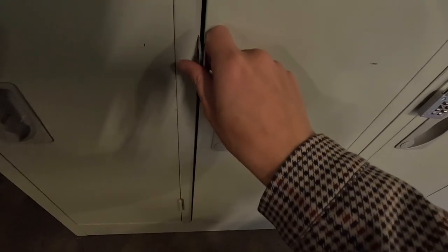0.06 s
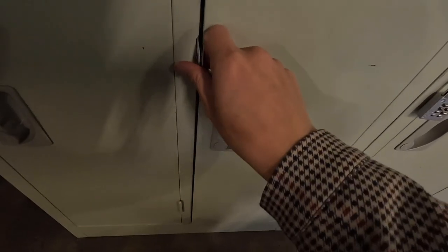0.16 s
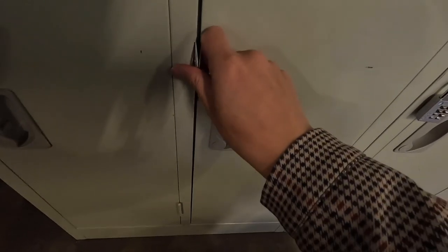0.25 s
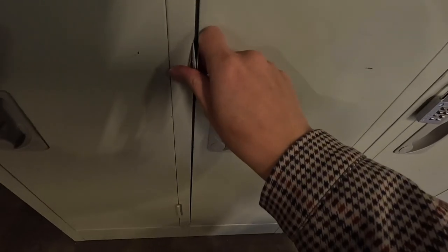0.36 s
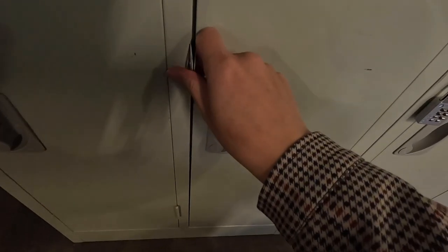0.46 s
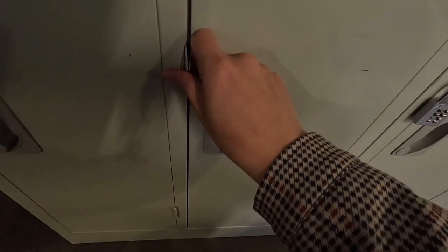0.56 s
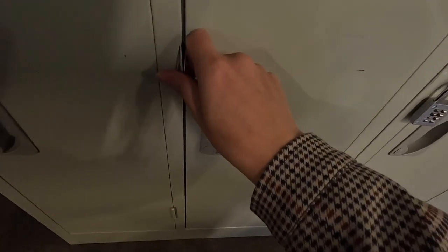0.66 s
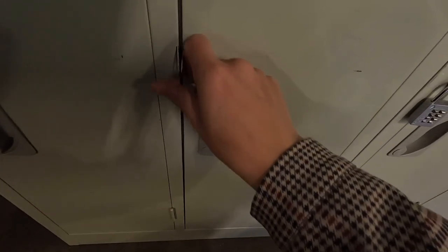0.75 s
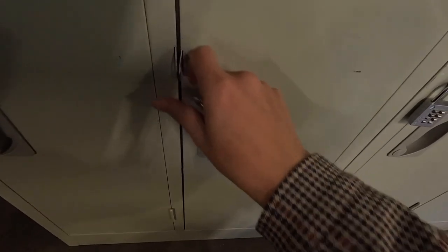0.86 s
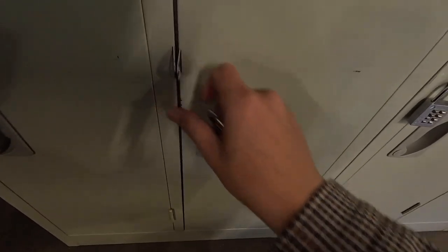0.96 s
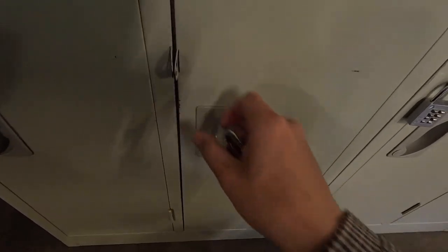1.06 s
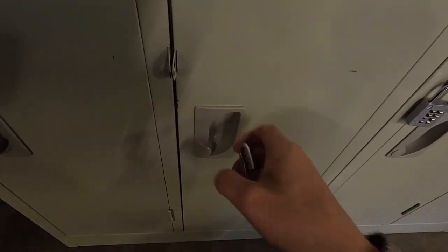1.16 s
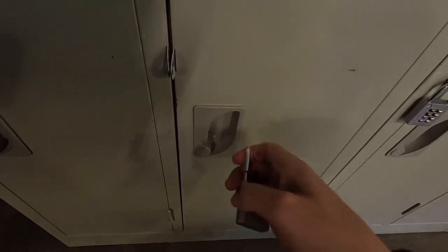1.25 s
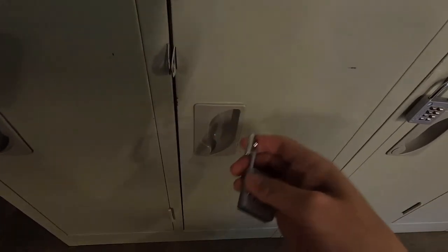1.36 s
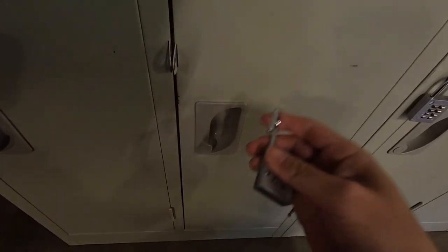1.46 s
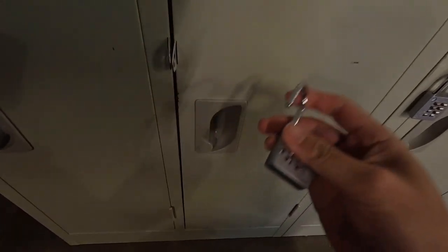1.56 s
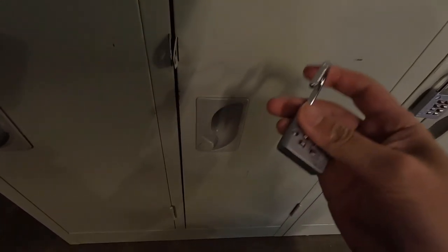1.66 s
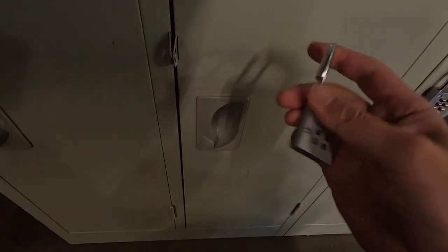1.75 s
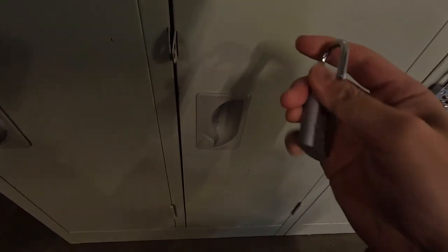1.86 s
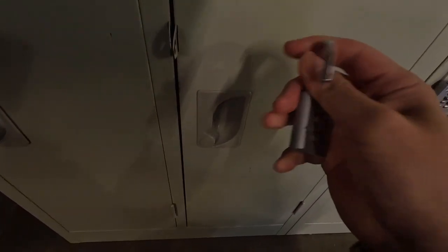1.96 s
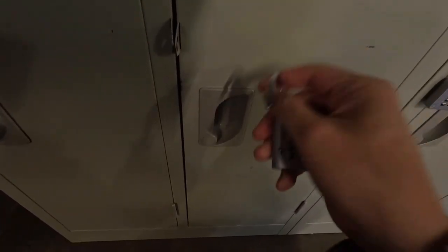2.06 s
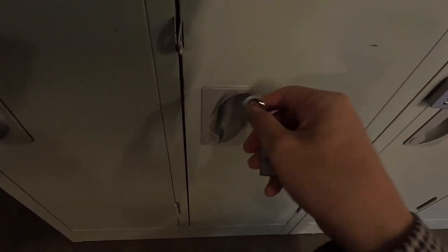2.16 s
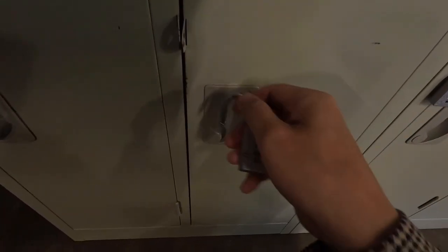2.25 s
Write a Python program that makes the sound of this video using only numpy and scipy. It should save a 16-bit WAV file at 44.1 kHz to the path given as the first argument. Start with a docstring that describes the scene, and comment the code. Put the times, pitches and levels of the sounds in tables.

```python
"""A sheet-metal locker door drags and slams in a burst of quick knocks, then rings down as decaying modes
and a dense wash, with bright filtered-noise latch ticks; lighter knocks follow.
Then a padlock clicks in the hand close to a phone: random contact trains ring damped modes in a small room.
Shaped noise gives ventilation and street rumble; the phone's gain control ducks on loud sound."""
import sys
import numpy as np
from scipy import signal
from scipy.fft import rfft, irfft
from scipy.io import wavfile
from scipy.ndimage import uniform_filter1d

SR = 44100
rng = np.random.default_rng(int(sys.argv[2]) if len(sys.argv) > 2 else 0)


def volts_from_decibels(level):
    """Turn decibel levels (scalar or array-like) into linear amplitude factors."""
    exponent = np.asarray(level, float) / 20
    return 10 ** exponent


def store_pcm(level_fs):
    """Save levels as 16-bit WAV."""
    pcm = np.round(np.clip(level_fs, -1, 1) * 32767).astype(np.int16)
    wavfile.write(sys.argv[1], SR, np.atleast_2d(pcm).T)


N = 101430
DOOR_NARROW_DB = -5  # extra side gain for the door's noise


def on_log(table, hz):
    """Log-frequency interpolation of a (f/Hz, value) table."""
    a = np.array(table, float)
    return np.interp(np.log(np.maximum(hz, 1)), np.log(a[:, 0]), a[:, 1])


def colour(x, table):
    """Linear filtering: multiply the spectrum by a (f/Hz, level/dB) table."""
    n = x.shape[-1]
    gain = volts_from_decibels(on_log(table, np.fft.rfftfreq(n, 1 / SR)))
    return irfft(rfft(x) * gain, n)


def unit(x):
    """Normalisation to rms 1."""
    return x / np.sqrt(np.mean(x ** 2))


# side relative to mid in diffuse sound: f/Hz, level/dB
STEREO_SPREAD = [(30, -20), (250, -16), (1000, -5), (4000, -2), (12000, -37.5)]


def wide(n, narrow_db=0):
    """Interchannel coherence: mid and side noise whose balance varies with frequency."""
    mid, side = rng.standard_normal((2, n))
    side = volts_from_decibels(narrow_db) * colour(side, STEREO_SPREAD)
    return mid + side * np.array([[1], [-1]])


def fade(t, t60):
    """Exponential decay: amplitude falls 60 dB in t60 seconds."""
    return np.exp(-np.log(1000) * t / np.maximum(t60, 1e-3))


def build_up(t, time_constant):
    """Exponential approach to full amplitude."""
    return 1 - np.exp(-t / time_constant)


def walk(rate):
    """Low-pass random drift: rate draws per second, smoothed twice."""
    k = int(SR / rate)
    steps = np.repeat(rng.standard_normal(N // k + 1), k)
    return uniform_filter1d(uniform_filter1d(steps, k), k)[:N]


def bands(x, shape):
    """Filter-bank synthesis: half-octave bands, each multiplied by shape(centre Hz), are summed."""
    n = x.shape[-1]
    spec = rfft(x)
    octave = np.log2(np.maximum(np.fft.rfftfreq(n, 1 / SR), 1) / 20)
    total = 0
    for k in range(21):
        weight = np.clip(1 - 2 * np.abs(octave - k / 2), 0, 1)
        total = total + irfft(spec * weight, n) * shape(20 * 2 ** (k / 2))
    return total


def add(out, x, at_s):
    """Superposition: mix x into out from a given time."""
    i = max(int(at_s * SR), 0)
    n = min(x.shape[-1], N - i)
    out[:, i:i + n] += x[..., :n]


# relative spectral density of ventilation and street rumble: f/Hz, level/dB per Hz
AIR_SPECTRUM = [(12, -31.5), (22, 5), (52, 1.5), (90, -4.5), (174, -7), (400, -10), (790, -29),
                (1840, -25.5), (3860, -42), (7660, -39.5), (9500, -55), (12000, -46), (15000, -67.5)]


def air():
    """Stationary broadband noise, slowly modulated: bands flicker a little, the rumble sways together."""
    level_db = -45.5
    flicker_db, sway_db = 1.0, 7  # multipliers of the random drifts
    sway = walk(5.1)

    def drift(f):
        return volts_from_decibels(flicker_db * walk(3.0) + sway_db * sway * (f < 100))

    return volts_from_decibels(level_db) * bands(unit(colour(wide(N), AIR_SPECTRUM)), drift)


def room(x):
    """Diffuse reverberation: convolution with exponentially decaying, low-passed noise."""
    t60_s, level_db, top_hz = 0.27, -20, 7000
    t = np.arange(SR // 2) / SR
    low_pass = signal.butter(1, top_hz, fs=SR, output="sos")
    # the tail is silent for its first 3 ms
    tail = signal.sosfilt(low_pass, wide(len(t))) * fade(t, t60_s) * (t > .003)
    tail = volts_from_decibels(level_db) * tail / np.sqrt(np.sum(tail ** 2) / 2)
    return signal.fftconvolve(x.mean(axis=0)[None], tail, axes=1)[:, :N]


# padlock clicks: t/s, relative level/dB, chatter/ms, brightness/dB an octave or more above 3500 Hz
LOCK_CLICKS = [(1.150, -45, 1.5, -12), (1.163, -38.5, 4.5, -18), (1.169, -38, 2.2, -13.5),
               (1.1875, -40.5, 1.8, -12), (1.1925, -42, 5.3, -8), (1.2012, -29, 5.9, -31),
               (1.231, -41, 11, 2), (1.2453, -24.5, 0.92, -9), (1.2468, -43, 6.9, 3.5),
               (1.4263, -22, 0.38, -14), (1.845, -41, 1.5, 5), (1.8483, -32, 3.8, 14.5),
               (1.8562, -17, 2, 12), (1.8597, -33.5, 5, 3), (1.9156, -53.5, 2.5, -4),
               (2.0944, -52.5, 1.93, 27), (2.129, -30.5, 7, 13), (2.1418, -40.5, 5.8, 3.5),
               (2.1785, -42, 4, -1), (2.2228, -28.5, 7.3, 1.5), (2.230, -22, 1.2, 36),
               (2.2317, -12, 1.8, -15.5), (2.235, -36, 30, 15.5), (2.250, -36.5, 13, -13),
               (2.269, -32.5, 12.6, -1)]
# padlock body and shackle modes: f/Hz, nominal level/dB, t60/s when freely held
LOCK_MODES = [(2646, -12.5, 0.0047), (3420, 4, 0.0088), (4120, -5.5, 0.0029), (5100, -0.5, 0.0032),
              (5510, -3, 0.0052), (7090, -9, 0.015), (7800, -25.5, 0.024), (8500, -5.5, 0.0026),
              (11250, -20.5, 0.0016)]
# left minus right as the lock moves to the right: t/s, level/dB
HAND_PAN = [(1.2, -2.5), (1.9, -4)]


def padlock():
    """Impulsive excitation of damped modes: a chatter of contacts, strongest early, rings the lock."""
    scatter_db, pitch_scatter = 7.5, 0.0043
    low_hz, contacts_per_ms = 2130, 6
    free_ms = 1.2  # a shorter chatter means a tighter grip, which damps the ring
    out, t = np.zeros((2, N)), np.arange(SR // 10) / SR
    hz, db, t60 = np.array(LOCK_MODES).T[:, :, None]
    # neighbouring modes swing in opposite senses, which fills the gaps between them
    sign = np.cos(np.pi * np.arange(len(LOCK_MODES)))[:, None]
    for at_s, click_db, chatter_ms, bright_db in LOCK_CLICKS:
        tilt_db = bright_db * np.log2(np.clip(hz / 3500, 1, 2))
        gains = sign * volts_from_decibels(db + tilt_db + scatter_db * rng.standard_normal(hz.shape))
        mode_hz = hz * (1 + pitch_scatter * rng.standard_normal(hz.shape))
        grip = np.clip(chatter_ms / free_ms, .4, 1)
        rings = np.sin(2 * np.pi * mode_hz * t) * fade(t, t60 * grip)

        share = 1000 * t / max(chatter_ms, .1)
        contact = rng.random(len(t)) < 1000 * contacts_per_ms / SR
        hits = rng.standard_normal(len(t)) * contact * np.exp(-share ** 3)
        hits[0] += 1.1
        rung = signal.fftconvolve(hits[None], rings, axes=1)
        # each mode keeps its share of the energy however the contacts fall
        rung *= np.linalg.norm(rings, axis=1, keepdims=True) / np.linalg.norm(rung, axis=1, keepdims=True)
        click = np.sum(gains * rung, axis=0)
        click /= np.sqrt(2 * uniform_filter1d(click ** 2, SR // 500).max())

        pan_db = np.interp(at_s, *np.array(HAND_PAN).T)
        add(out, click * volts_from_decibels(click_db + np.array([[pan_db], [-pan_db]]) / 2), at_s)
    return signal.sosfilt(signal.butter(5, low_hz, "high", fs=SR, output="sos"), out)


# latch ticks as the door bounces: t/s, relative level/dB
LATCH_TICKS = [(0.3312, -6.5), (0.37, -15), (.398, -25.5)]


def latch():
    """Resonant band-pass noise with rapid decay: short bright ticks of the latch against the frame."""
    centre_hz, width_hz, t60_s = 6420, 3500, 0.0066
    out, t = np.zeros((2, N)), np.arange(SR // 20) / SR
    edges_hz = [centre_hz - width_hz / 2, centre_hz + width_hz / 2]
    band_pass = signal.butter(2, edges_hz, "band", fs=SR, output="sos")
    for at_s, db in LATCH_TICKS:
        noise = unit(signal.sosfilt(band_pass, wide(len(t))))
        add(out, volts_from_decibels(db) * noise * fade(t, t60_s), at_s)
    return out


# trend of the drag: start level/dB, slope/(dB per s)
DRAG_TREND = (-31.5, -14)
# relative spectral density of the drag: f/Hz, level/dB per Hz
DRAG_SPECTRUM = [(30, 3), (129, 1.5), (567, -19.5), (1340, -20.5), (1970, -27), (8690, -49.5),
                 (11900, -45.5), (15000, -72)]


def drag():
    """Frictional noise with random amplitude modulation: the door rubs and shudders on its way shut."""
    stop_s = .236
    t = np.arange(N) / SR
    grain = volts_from_decibels(2 * walk(80)) * fade(np.maximum(t - stop_s, 0), .1)
    start_db, slope_db = DRAG_TREND
    rubbing = unit(colour(wide(N, DOOR_NARROW_DB), DRAG_SPECTRUM))
    return rubbing * volts_from_decibels(start_db + slope_db * t) * grain


# knocks on the door: t/s, relative level/dB, contact time constant/ms
DOOR_KNOCKS = [(0.071, -53.5, 0.029), (0.2362, -15.5, 0.38), (0.2553, -16, 0.063), (0.2777, -10.5, 0.02),
               (.310, -11.5, 0.078), (0.333, -15.5, 0.062), (0.368, -22, 0.034), (0.786, -50, 0.052),
               (0.8866, -32, 0.066)]
# door and cabinet modes: f/Hz, nominal level/dB, t60/s
DOOR_MODES = [(34.35, 1, 0.6), (59.16, 6.5, 0.29), (117.4, 5.5, 0.24), (155, -4, 0.43), (207.7, -2.5, 0.24),
              (299.3, -12, 0.5), (549, -10.5, 0.22), (688.7, -17.5, 0.31), (953.4, -8.5, 0.32),
              (1045.6, -9, 0.26), (1390.4, -8.5, 0.15)]
# relative spectral density of the sheet's close modes: f/Hz, level/dB per Hz
SHEET_SPECTRUM = [(35, -50), (60, -8.5), (127, -5), (636, -18.5), (991, -16.5), (1140, -19.5), (7060, -22),
                  (16000, -46.5)]
# decay of that wash: f/Hz, t60/s
SHEET_DECAY = [(60, 0.81), (300, 0.45), (1000, 0.36), (4000, 0.28), (12000, .19)]


def door():
    """Modal superposition: knocks ring discrete and close modes; a softer contact low-passes the ring."""
    modes_db = -0.5  # modes against the wash
    build_up_ms, build_up_cycles = 0.2, 0.67
    crack_db, crack_t60_s = -2.5, .05  # extra treble just after contact
    out, t = np.zeros((2, N)), np.arange(SR) / SR
    hz, db, t60 = np.array(DOOR_MODES, float).T[:, :, None]

    def wash_shape(f):
        crack = (f > 1200) * volts_from_decibels(crack_db) * fade(t, crack_t60_s)
        return fade(t, on_log(SHEET_DECAY, f)) * build_up(t, build_up_cycles / f) * (1 + crack)

    for at_s, knock_db, contact_ms in DOOR_KNOCKS:
        wash = bands(unit(colour(wide(SR, DOOR_NARROW_DB), SHEET_SPECTRUM)), wash_shape)
        gains = volts_from_decibels(db + 1.4 * rng.standard_normal(hz.shape)) * rng.choice([-1, 1], hz.shape)
        mode_hz = hz * (1 + 0.013 * rng.standard_normal(hz.shape))
        modes = gains * np.sin(2 * np.pi * mode_hz * t) * fade(t, t60)
        modes = (modes * build_up(t, build_up_cycles / hz)).sum(axis=0)
        ring = (wash + volts_from_decibels(modes_db) * modes) * build_up(t, build_up_ms / 1000)
        pole = np.exp(-1000 / (max(contact_ms, .005) * SR))
        add(out, volts_from_decibels(knock_db) * signal.lfilter([1 - pole], [1, -pole], ring), at_s)
    return out


def scene():
    """Linear superposition of all sources at the phone; the room answers the padlock and latch."""
    near = padlock() + latch()
    return door() + drag() + near + room(near) + air()


def microphone(x):
    """Low-pass response and interchannel delay: the top rolls off and the left port lags."""
    top_hz, lag_samples = 14300, .75
    x = signal.sosfilt(signal.butter(2, top_hz, fs=SR, output="sos"), x)
    phase = np.exp(-2j * np.pi * lag_samples * np.fft.rfftfreq(N))
    return np.array([irfft(rfft(x[0]) * phase, N), x[1]])


def gain_control(x):
    """Dynamic range compression: gain falls at once on loud sound and recovers slowly."""
    threshold_db, ratio, release_s = -34, 1.224, 0.25
    block = 64  # samples
    level = uniform_filter1d(np.abs(x).mean(axis=0), 441)[::block]
    held, keep = np.empty(len(level)), np.exp(-block / (release_s * SR))
    envelope = 0.
    for i, now in enumerate(level):
        envelope = max(now, envelope * keep)
        held[i] = envelope
    gain = np.minimum(1, volts_from_decibels(threshold_db) / (held + 1e-9)) ** (1 - 1 / ratio)
    return x * np.interp(np.arange(N), np.arange(len(gain)) * block, gain)


def top_cut(x):
    """Nothing passes above the cut-off."""
    return signal.sosfilt(signal.butter(12, 16240, fs=SR, output="sos"), x)


def record(dry):
    """Signal chain in series: the microphone response precedes gain control."""
    mix = gain_control(microphone(dry))
    return top_cut(mix)


dry = scene()
out = record(dry)
store_pcm(out)
```